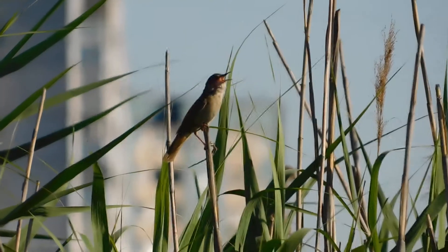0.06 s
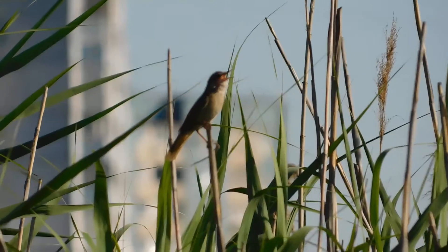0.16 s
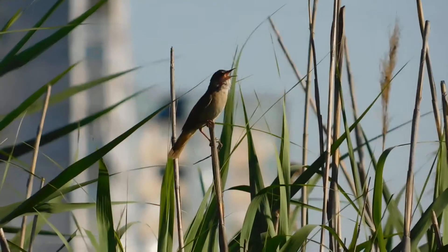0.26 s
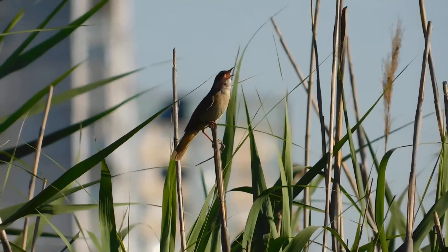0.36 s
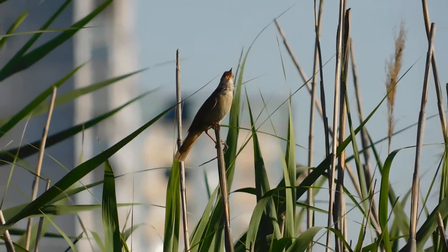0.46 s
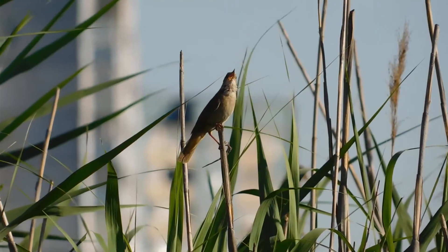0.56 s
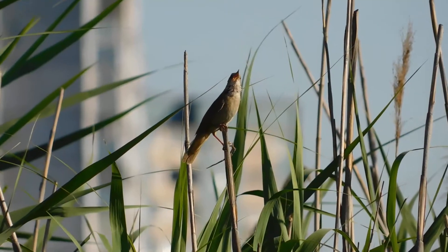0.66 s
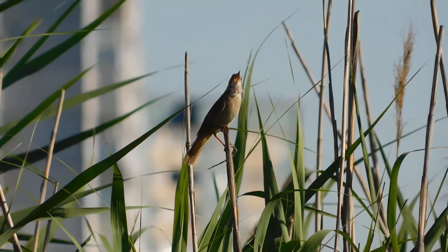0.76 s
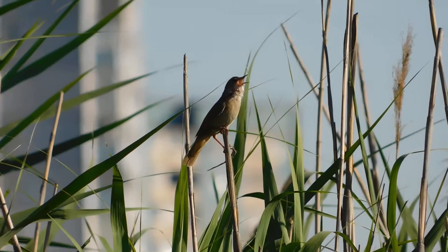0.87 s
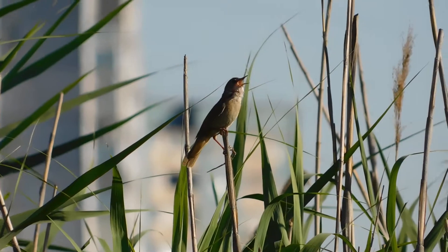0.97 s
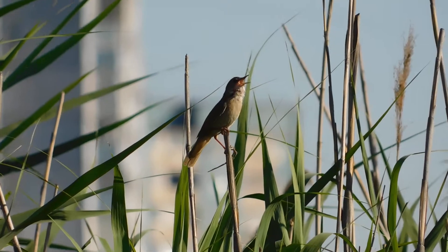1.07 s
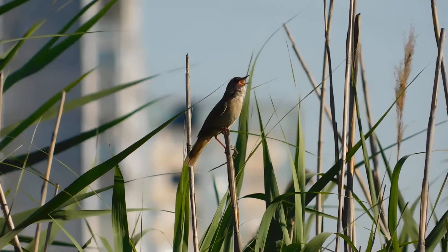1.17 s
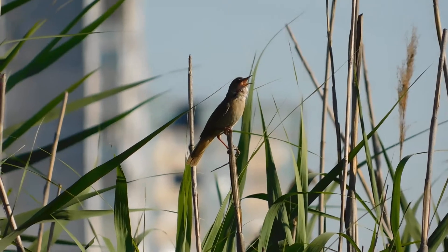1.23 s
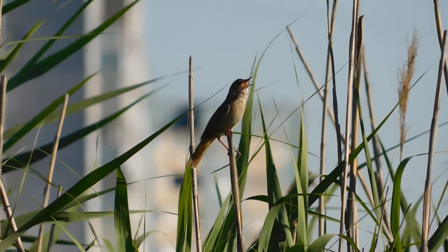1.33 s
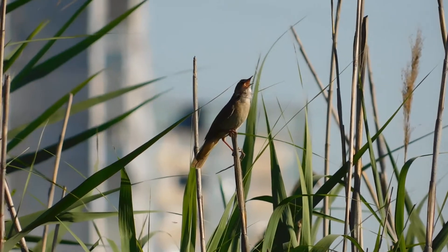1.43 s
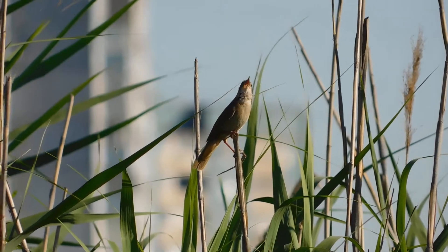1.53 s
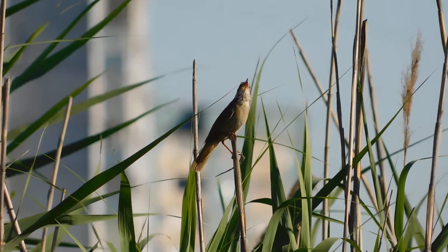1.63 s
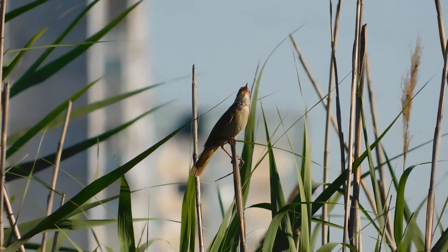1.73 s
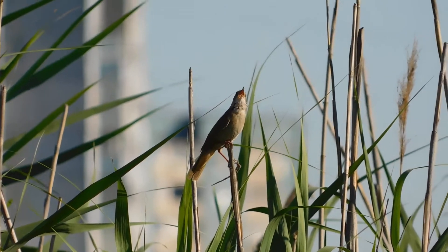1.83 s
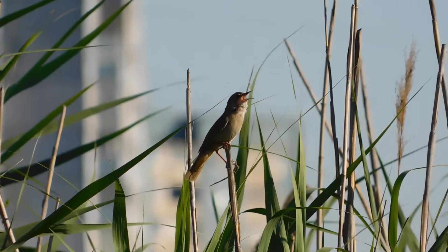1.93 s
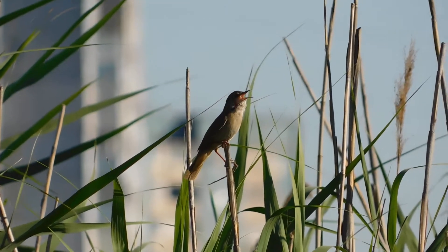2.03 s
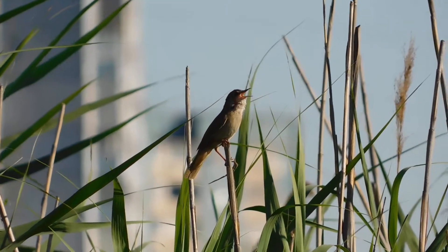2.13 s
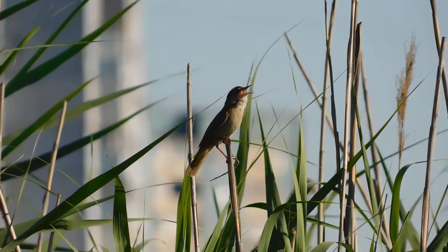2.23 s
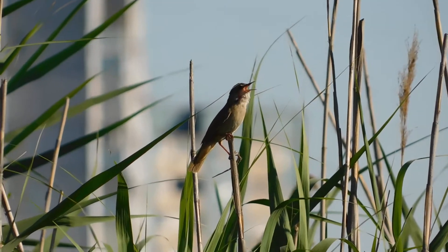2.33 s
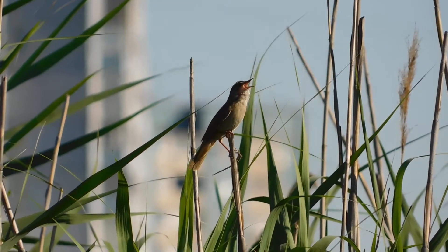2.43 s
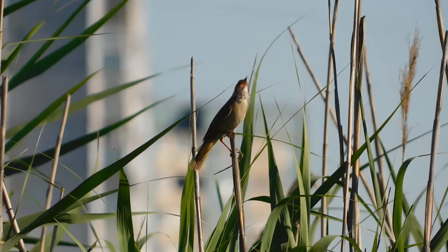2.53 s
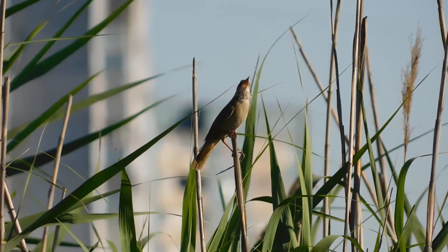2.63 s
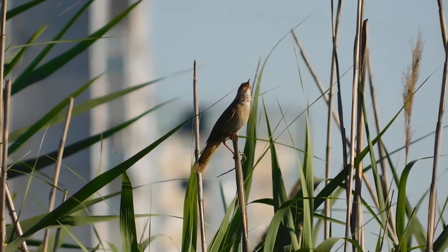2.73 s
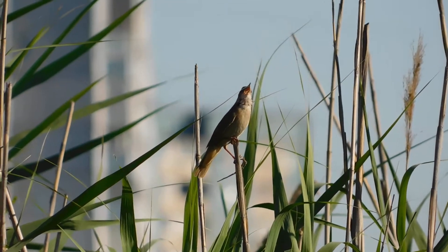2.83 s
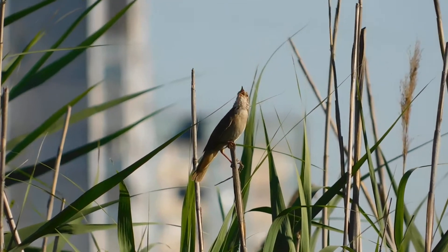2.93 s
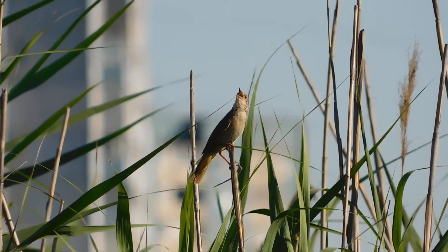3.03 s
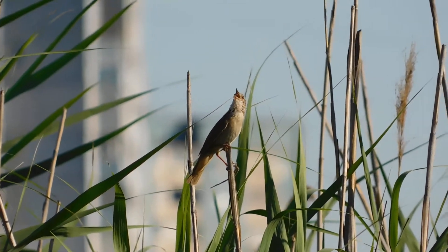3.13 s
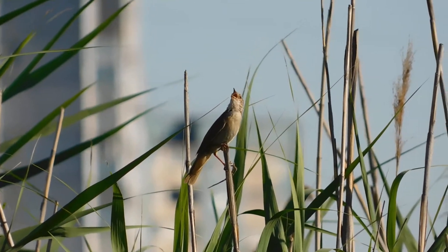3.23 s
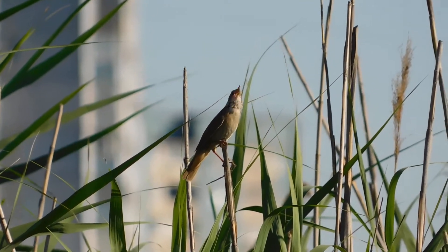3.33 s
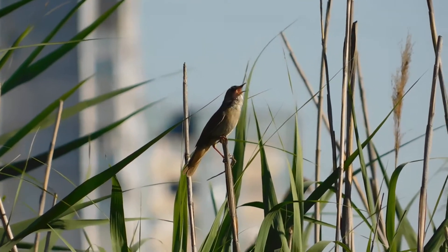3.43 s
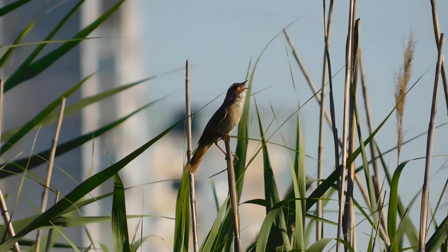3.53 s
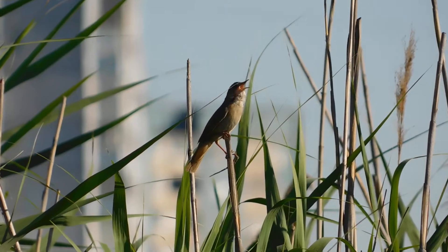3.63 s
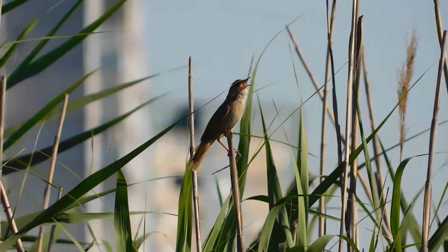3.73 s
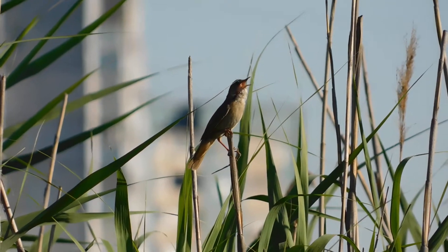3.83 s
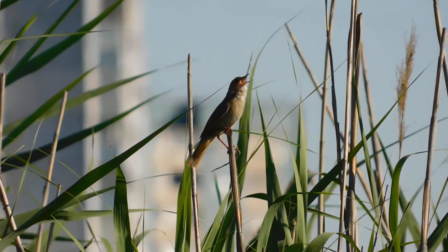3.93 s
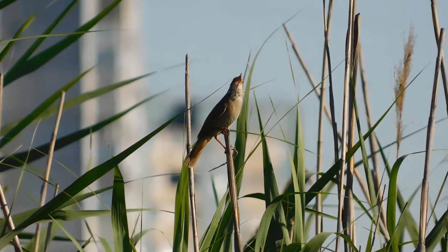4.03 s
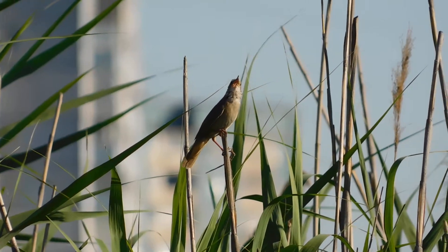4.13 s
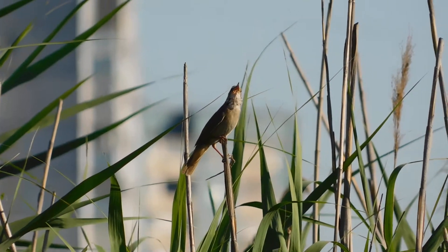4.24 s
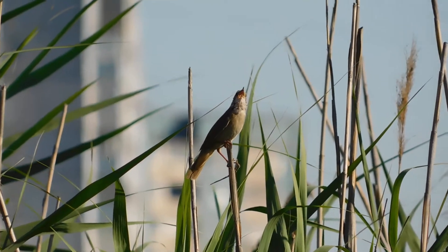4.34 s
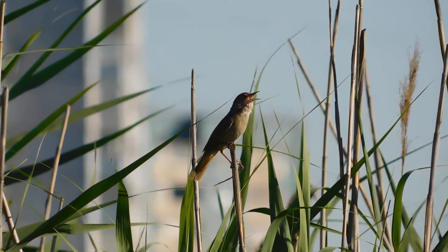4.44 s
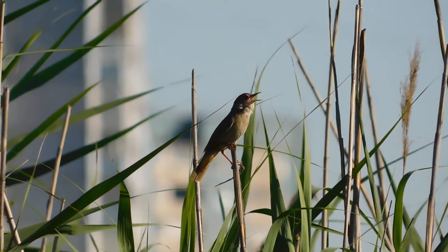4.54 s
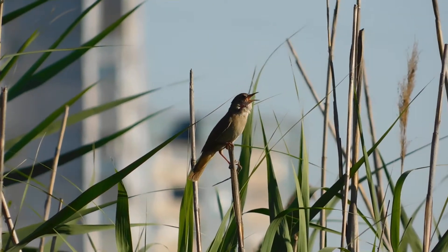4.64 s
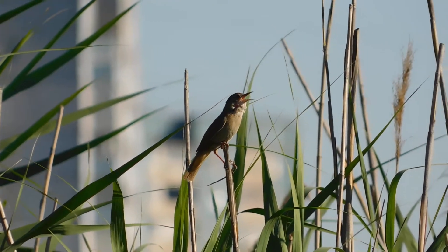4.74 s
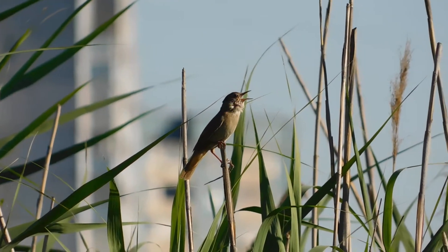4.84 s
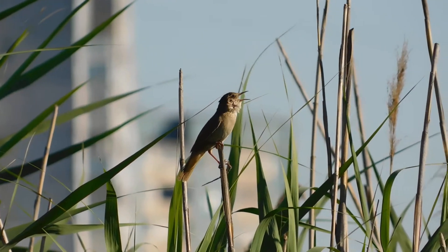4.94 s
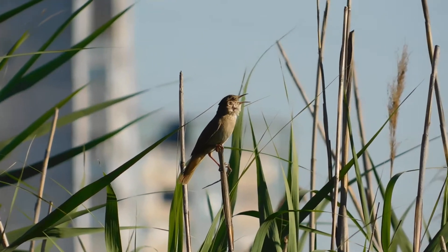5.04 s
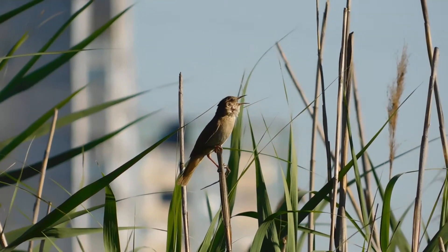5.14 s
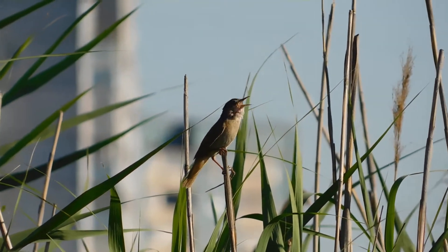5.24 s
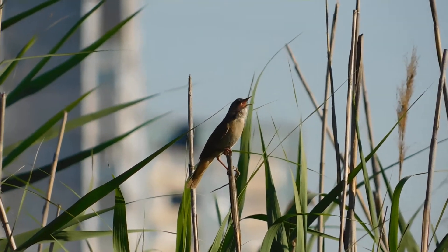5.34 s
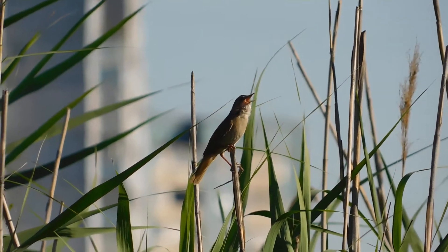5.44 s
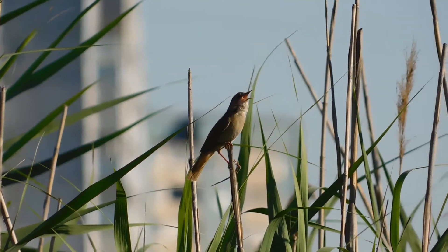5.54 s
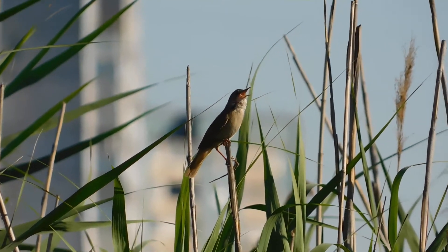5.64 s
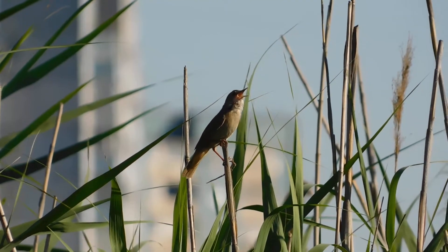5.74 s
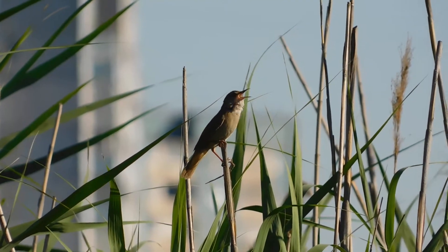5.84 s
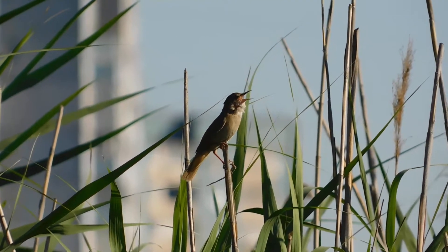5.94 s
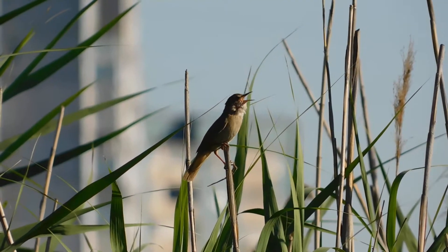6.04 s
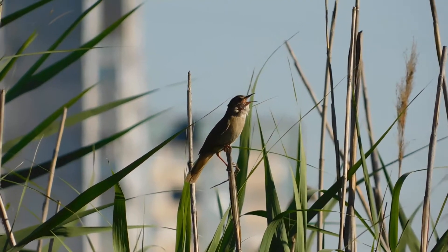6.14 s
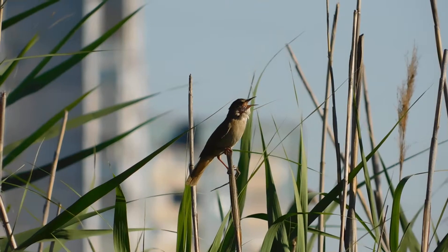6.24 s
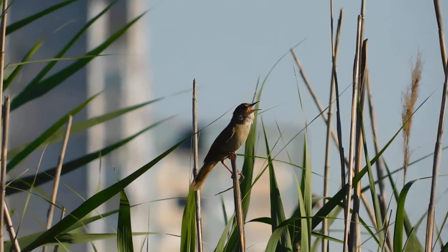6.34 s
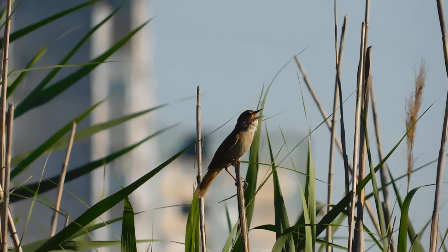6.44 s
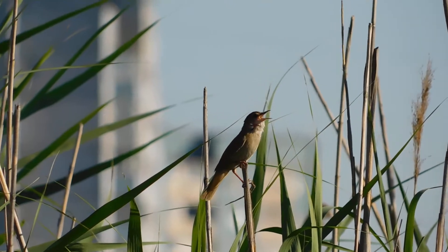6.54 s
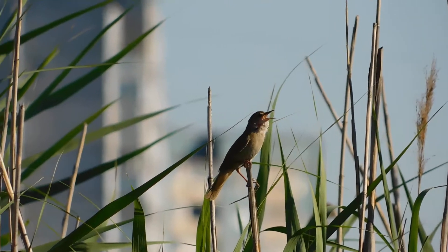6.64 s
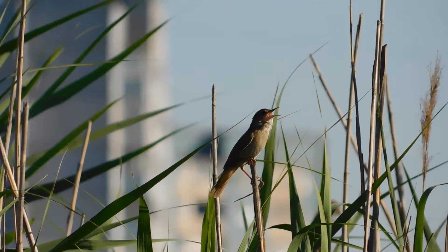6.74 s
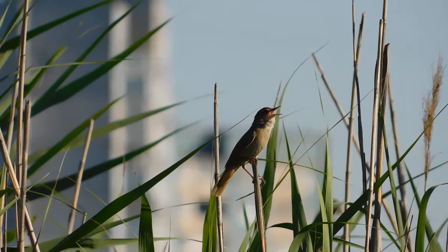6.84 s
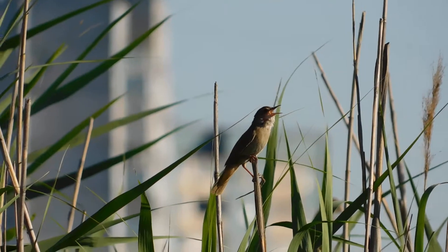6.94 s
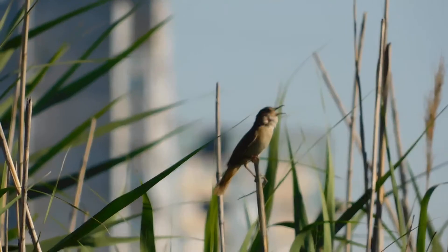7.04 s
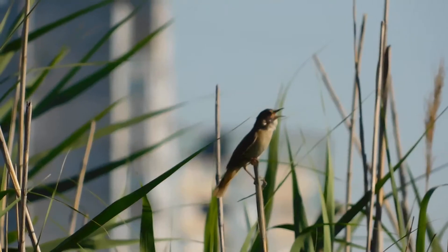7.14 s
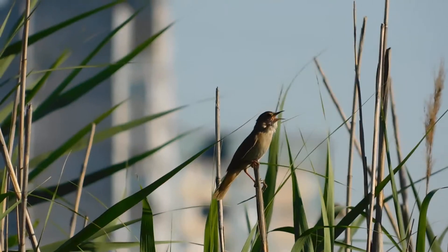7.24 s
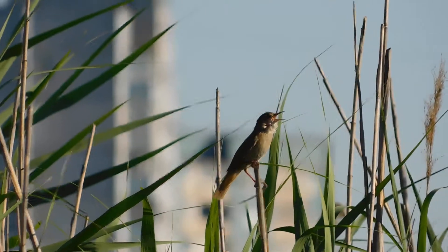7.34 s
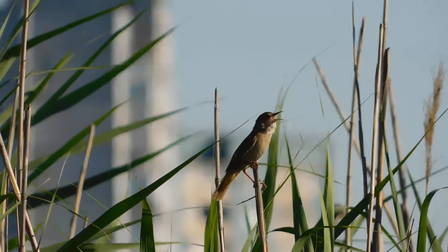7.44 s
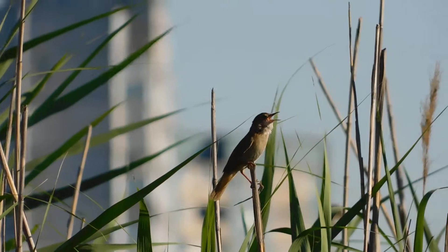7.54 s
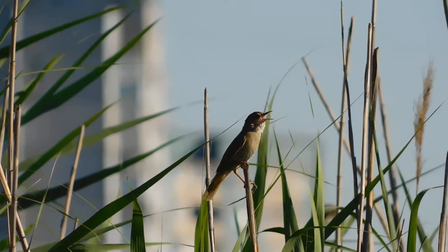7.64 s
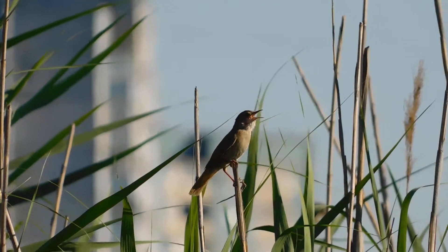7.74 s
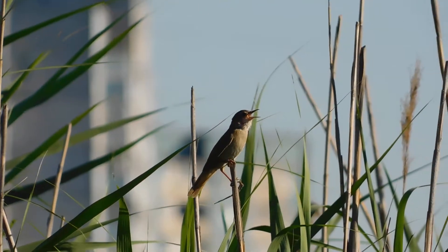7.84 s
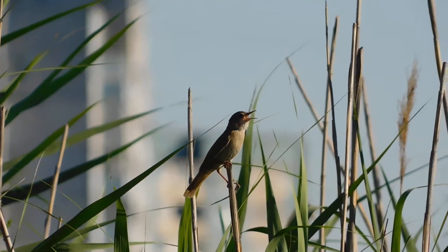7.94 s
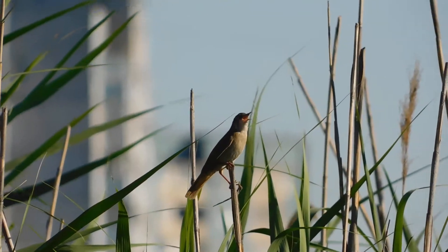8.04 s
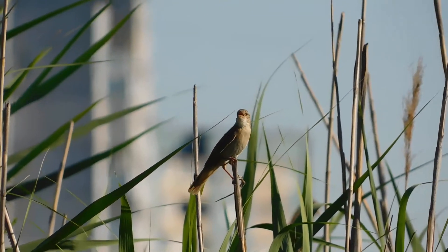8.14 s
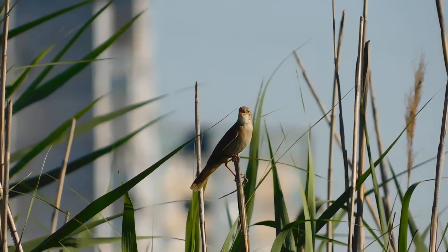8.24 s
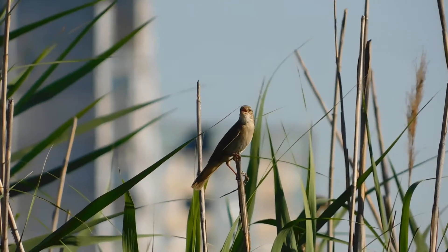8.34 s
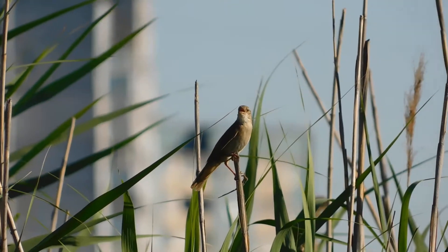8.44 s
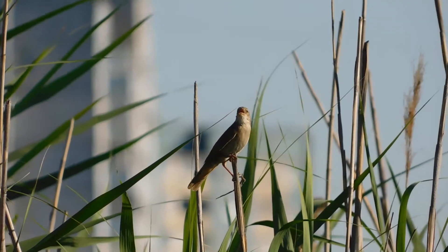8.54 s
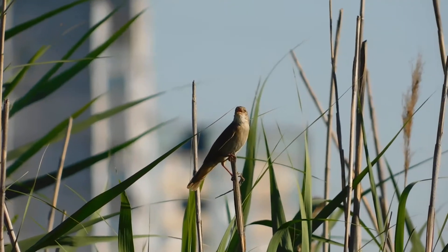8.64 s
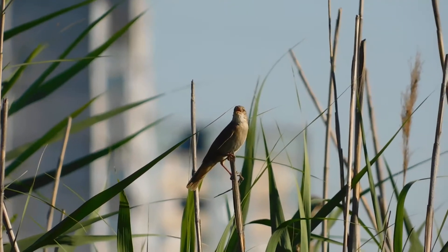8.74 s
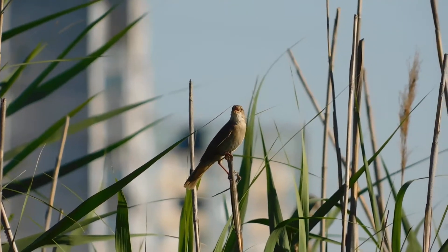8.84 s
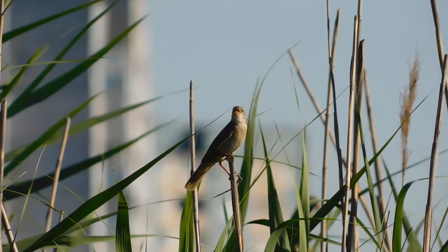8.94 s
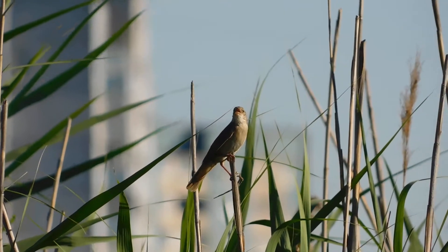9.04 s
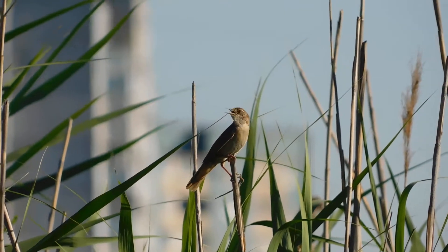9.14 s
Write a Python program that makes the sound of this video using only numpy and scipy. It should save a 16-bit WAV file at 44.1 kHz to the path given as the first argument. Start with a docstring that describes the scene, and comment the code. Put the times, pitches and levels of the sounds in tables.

```python
"""A warbler reels from a reed stem at the edge of a town: a tick, an upward flick and a level note, some 52 times a second.
The reel stumbles once, slows evenly, fades and stops; two sharp clicks and a faint one follow near the microphone.
Far off, other small birds chirp over a wash of traffic, a rumble, a faint hiss and an idling engine.
The birds and the engine are sine tones, the ticks and clicks ringing resonances, the wash, rumble and hiss shaped noise."""
import sys
import numpy as np
from scipy import signal
from scipy.fft import rfft, irfft
from scipy.io import wavfile

SR = 44100
rng = np.random.default_rng(int(sys.argv[2]) if len(sys.argv) > 2 else 0)


def file_out(sig):
    """Save sig as 16-bit WAV at sys.argv[1]."""
    # one column per channel
    cols = np.atleast_2d(sig).T
    # limit, then scale
    lim = np.clip(cols, -1, 1)
    pcm = np.round(lim * 32767).astype(np.int16)
    wavfile.write(sys.argv[1], SR, pcm)


N = 405279
TIME = np.arange(N) / SR

# Strength of the song through the scene. Each row: time in seconds, level in dB.
SONG_LEVEL = [(0.15, -48), (0.19, -48), (0.47, -48), (2.02, -49), (4.91, -47), (4.95, -49), (5.39, -47),
              (7.3, -48.5)]
# The two whistled notes of a syllable, traced point by point.
# Each row: time after the syllable's start in ms, pitch in Hz, relative level in dB.
FLICK = [(-.4, 3450, -16), (.15, 3520, -2), (.8, 3980, 4.5), (1.25, 4350, 2), (1.8, 4590, -2.5),
         (2.5, 4580, -6), (3.4, 4480, -6), (4.3, 4050, -6), (5.2, 4000, -7), (6.1, 4100, -10)]
NOTE = [(6.55, 3800, -20), (7.1, 3890, 0), (7.55, 3950, 4.3), (8.4, 3990, 3.8), (9.4, 4000, 3.4),
        (10.1, 4100, -3), (11.8, 4110, -16)]
# Resonances of the opening tick. Each row: frequency in Hz, width in Hz, relative level in dB.
TICK_RESONANCES = [(1860, 1000, -7.5), (2250, 230, -4), (2970, 610, 0.5), (5000, 680, -1), (6010, 1900, -1),
                   (6890, 680, 2)]
# The overtones and rasp weaken as the bird tires, and further as the song fades.
BRIGHT_DB, TIRING_DB_PER_S, DULLING_DB_PER_DB = 1.65, .35, 1.2


def reel(flick_db=7.0, note_db=6.5, tick_db=18.0, flicker_db=1.0):
    """Each syllable snaps open with a tick, flicks upward, then sounds its level note."""
    level_db = in_time(SONG_LEVEL) + fade()
    bright_db = BRIGHT_DB - TIRING_DB_PER_S * TIME + DULLING_DB_PER_DB * fade()
    bright_db = bright_db + flicker_db * rng.standard_normal(N)
    starts = syllable_starts()

    flick = from_db(flick_db) * notes(starts, FLICK, bright_db, scatter_hz=34.5, uneven_db=0.9,
                                      length_spread=0.033, rasp_db=-28.0)
    # the small throat passes little below the foot of the flick
    flick = signal.sosfilt(signal.butter(8, 3380, "high", fs=SR, output="sos"), flick)
    note = from_db(note_db) * notes(starts, NOTE, bright_db, scatter_hz=31.9, uneven_db=0.94,
                                    length_spread=0.02, rasp_db=-32.5)

    # the tick snaps just over half a millisecond before the syllable's start
    snaps = np.zeros(N)
    snaps[starts - SR // 1700] = from_db(tick_db + rng.normal(0, .8, len(starts)))
    # no two ticks are alike: each carries a fraction of a millisecond of grit
    grit_level = .08 * signal.lfilter([1], [1, -.94], snaps + 1e-18)
    snaps = snaps + grit_level * rng.standard_normal(N)
    tick = 0
    for k, (hz, width_hz, db) in enumerate(TICK_RESONANCES):
        tick = tick + (-1) ** k * from_db(db) * resonance(snaps, hz, width_hz)
    tick = signal.sosfilt(signal.butter(6, 7400, fs=SR, output="sos"), tick)

    syllables = panned(flick, left_db=-3.2) + panned(note, left_db=3.5) + panned(tick, left_db=-2.0)
    return from_db(level_db) * syllables


# Overtones of the notes. Each row: multiple of the pitch, relative level in dB.
OVERTONES = [(2, -35.5), (3, -36.5)]
# Breathy rasp that rides on the notes. Each row: frequency in Hz, relative density in dB per Hz.
RASP = [(4200, -23), (4900, 7), (5600, 7), (7000, 7.5), (8200, -0.5), (9000, 2.5), (10000, -40),
        (11000, -12), (12000, 6), (12800, -5), (13600, -5), (15500, -14)]


def notes(starts, contour, bright_db, scatter_hz, uneven_db, length_spread, rasp_db):
    """One short whistle per syllable, each with its own pitch, strength and length, and a rasp that follows it."""
    ms, hz, db = np.transpose(contour)
    offsets = np.arange(-SR // 1000, SR // 75)
    detune, strength, length, bend = rng.standard_normal((len(starts), 4)).T[:, :, None]
    age_ms = offsets * 1000 / SR * (1 + length_spread * length)

    along = (age_ms - ms.mean()) / np.ptp(ms)
    pitch = np.interp(age_ms, ms, hz) + scatter_hz * (detune + bend * along)
    phase = 2 * np.pi * (np.cumsum(pitch, axis=1) / SR + rng.random((len(starts), 1)))
    # silent outside the contour
    size_db = np.interp(age_ms, ms, db, left=-np.inf, right=-np.inf)
    size = from_db(size_db + uneven_db * strength)

    samples = starts[:, None] + offsets
    overtones = sum(from_db(level) * np.sin(k * phase) for k, level in OVERTONES)
    rasp = from_db(rasp_db) * diffuse(RASP)[0][samples]
    voice = np.sin(phase) + from_db(bright_db[starts, None]) * (overtones + rasp)
    out = np.zeros(N)
    np.add.at(out, samples, size * voice)
    return out


FIRST_START_S, LAST_START_S = .0036, 7.645
# syllables per second at the start, and how much of that is lost each second
PACE_PER_S, SLOWING_PER_S = 52.99, .122
# one syllable comes early: the moment, and the share of a syllable skipped
STUMBLE_S, STUMBLE_SHARE = .92, .32
SAG_PER_S_PER_DB = .33  # the pace sags with the fade


def syllable_starts():
    """Sample of every start: an evenly slowing pace with one stumble, a final sag and a slight tremor."""
    pace = PACE_PER_S - SLOWING_PER_S * TIME + SAG_PER_S_PER_DB * fade()
    turns = np.cumsum(pace) / SR
    turns = turns + STUMBLE_SHARE * (TIME > STUMBLE_S - FIRST_START_S)
    starts = np.interp(np.arange(int(turns[-1])), turns, TIME) + FIRST_START_S
    starts = starts[starts < LAST_START_S]
    tremor_s = rng.normal(0, .00013, len(starts))
    return ((starts + tremor_s) * SR).astype(int)


FADE_S, FADE_DB_PER_S = 7.42, 20


def fade():
    """Loss of strength as the song runs out, in dB."""
    return -FADE_DB_PER_S * np.maximum(TIME - FADE_S, 0)


# Narrow bands that a close reflection cancels. Each row: frequency in Hz, width in Hz, depth from 0 to 1.
HOLLOWS = [(3680, 150, .25), (4235, 120, .88), (4760, 130, .6)]


def hollowed(x):
    """A close reflection cancels narrow bands: part of each resonance is subtracted."""
    for hz, width_hz, depth in HOLLOWS:
        x = x - depth * resonance(x, hz, width_hz)
    return x


# The reed bed around the singer, in one row:
# tail level in dB, time for the tail to fall 60 dB in s, near scatter level in dB, its decay time in s.
SINGER_REEDS = (-9, .23, -11.5, .014)


def reed_bed(x, wet_db, t60, near_db, near_s):
    """Stems a metre or two away scatter the sound; the wider bed answers with a thin tail."""
    age = TIME[:SR // 2]
    early, late = rng.standard_normal((2, 2, len(age))) * (age > .005)
    early = early * np.exp(-age / near_s)
    late = late * from_db(-60 * age / t60)
    echoes = from_db(near_db) * rms_one(early) + from_db(wet_db) * rms_one(late)
    echoes = echoes / np.sqrt(len(age))
    return x + signal.fftconvolve(np.atleast_2d(x), echoes, axes=1)[:, :N]


# Contacts close to the microphone. Each row: start in seconds, level in dB, pitch factor,
# frequency in Hz above which it is dulled, left minus right in dB.
CLICKS = [(8.0197, -40, 1, 2500, -2), (8.0327, -28.5, 1.06, 11000, -8), (8.5256, -34, 0.805, 3040, -12.5),
          (8.5263, -39.5, 0.99, 9000, -12), (8.5276, -35, 0.65, 1300, -8), (8.538, -42.5, 0.33, 700, -3),
          (8.55, -45, 0.29, 600, -1), (8.903, -56, 1.7, 15000, 0)]
# What they ring with. Each row: frequency in Hz and relative level in dB, then the time in seconds
# to fall 60 dB; the pitch factor multiplies the frequency and divides the time.
CLICK_MODES = [(620, -17, 0.0066), (840, -14, 0.011), (1130, -6, 0.0094), (1505, -4, 0.014),
               (2280, -7, 0.0077), (2860, -9, 0.0081), (3650, -4, 0.015), (5960, -14, 0.0058),
               (8370, -19, 0.005), (10150, -22, 0.0044)]


def clicks(lag_s=.00014, rattle=0.49):
    """Short dry contacts ring a small hard body, each mode a decaying sine with a gritty noise band."""
    out, age = np.zeros((2, N)), TIME[:SR // 25]
    for s, db, factor, dull_hz, left_db in CLICKS:
        ring = 0
        for k, (hz, mode_db, t60) in enumerate(CLICK_MODES):
            pitch = hz * factor
            grit = rms_one(resonance(rng.standard_normal((2, len(age))), pitch, pitch / 2))
            decay = from_db(mode_db - 60 * age * factor / t60)
            ring = ring + (-1) ** k * decay * (np.sin(2 * np.pi * pitch * age) + rattle * grit)
        ring = signal.sosfilt(signal.butter(2, dull_hz, fs=SR, output="sos"), ring)
        start = int(s * SR)
        out[:, start:start + len(age)] += panned(from_db(db) * ring, left_db)
    # the right channel hears them slightly later
    return np.array([out[0], np.roll(out[1], int(lag_s * SR))])


# A far bird's short arched peeps. Each row: centre in seconds, length in seconds, top pitch in Hz, level in dB.
PEEPS = [(4.828, .016, 5700, -69), (4.862, .012, 4950, -59), (5.09, .046, 6720, -62),
         (5.565, .022, 5660, -64), (8.372, .024, 6250, -73), (8.49, .026, 6250, -75),
         (8.607, .03, 5750, -74), (8.857, .03, 5800, -75)]
# Its swoops, which dip and climb while a lower voice joins in.
# Each row: centre in seconds, lowest pitch in Hz, level in dB, pitch ratio of the lower voice.
SWOOPS = [(5.19, 5830, -62, .83), (5.285, 5800, -63, .83), (5.402, 5650, -68, .84), (8.722, 7100, -69, .5)]
# bends are the share of the pitch gained at both ends
PEEP_BEND, SWOOP_BEND, SWOOP_S = -0.044, 0.23, 0.052


def far_birds(lower_voice_db=5):
    """Arched peeps and two-voiced swoops, whistled as bending tones."""
    out = sum(from_db(db) * whistle(s, length, hz, PEEP_BEND) for s, length, hz, db in PEEPS)
    for s, hz, db, ratio in SWOOPS:
        upper = whistle(s, SWOOP_S, hz, SWOOP_BEND, skew=.9)
        lower = whistle(s, SWOOP_S, hz * ratio, SWOOP_BEND / 2, skew=3.0)
        # the deeper the lower voice, the weaker
        out = out + from_db(db) * (upper + from_db(lower_voice_db) * ratio ** 2 * lower)
    return out


def whistle(s, length, hz, bend, skew=0, waver_share=0.0124):
    """A thin wavering tone centred on s; its pitch bends toward both ends, and skew moves its weight to the end."""
    along = np.linspace(-1, 1, int(length * SR))
    waver = np.interp(along, np.linspace(-1, 1, num=12), rng.standard_normal(12))
    pitch = hz * (1 + bend * along ** 2 + waver_share * waver)
    shape = np.cos(np.pi * along / 2) * np.exp(skew * along)
    out, start = np.zeros(N), int((s - length / 2) * SR)
    out[start:start + len(along)] = shape / shape.max() * np.sin(2 * np.pi * np.cumsum(pitch) / SR)
    return out


# Spectra of the distant rumble, the traffic wash and a faint high hiss, perhaps air in the reeds.
# Each row: frequency in Hz, relative density in dB per Hz.
RUMBLE = [(15, -21), (28, 0.5), (36, 2.5), (45, 1.5), (59, 5.5), (72, -3.5), (102, -4), (120, -11),
          (180, -33.5)]
TRAFFIC = [(60, 3.5), (170, -4), (280, 0), (420, -1), (650, 1.5), (820, -2), (1000, 0), (1200, -4.5),
           (1500, -5.5), (2000, -10.5), (2500, -11.5), (3100, -15.5), (4300, -28), (5500, -30), (7000, -50)]
HISS = [(2000, -10), (4500, -1), (7000, -1), (9500, -1.5), (12000, -3.5), (15000, -6), (17000, -13)]
# Swell of the traffic. Each row: time in seconds, level in dB before traffic_db is added.
TRAFFIC_SWELL = [(0.0, -57.5), (1.2, -57.5), (1.84, -56.5), (2.28, -58), (9.19, -58)]
# Ringing bands in the town noise. Each row: frequency in Hz, width in Hz,
# level in dB of the white noise that drives the band.
TOWN_BANDS = [(1763, 46, -45.5), (2190, 47, -45), (2890, 97, -51)]
# Swells of the hiss. Each row: centre in seconds, half width in seconds, rise in dB.
HISS_SWELLS = [(.66, .3, 7.8), (1.5, .3, 3), (3.2, 0.88, 4.5), (3.8, 0.14, 3), (5.7, 0.25, 6.5),
               (8.87, .42, 6)]


def town(rumble_db=-62.5, traffic_db=2.5, hiss_db=-78.5):
    """Engines drone far away under a slowly swelling wash of tyres and a faint hiss."""
    rumble = from_db(rumble_db) * diffuse(RUMBLE) + engine()
    traffic = from_db(in_time(TRAFFIC_SWELL) + traffic_db) * diffuse(TRAFFIC)
    bands = 0
    for hz, width_hz, db in TOWN_BANDS:
        bands = bands + from_db(db) * resonance(rng.standard_normal((2, N)), hz, width_hz)
    rise_db = sum(db * np.exp(-((TIME - s) / width) ** 2) for s, width, db in HISS_SWELLS)
    hiss = from_db(hiss_db + rise_db) * diffuse(HISS)
    return panned(rumble + traffic + bands + hiss, left_db=-0.6)


# Orders of the far idling engine. Each row: multiple of the turning rate, level in dB.
ENGINE_ORDERS = [(3, -66.5), (4, -66.5), (5, -71.5)]


def engine(turning_hz=20, waver_hz=.12, wavers_per_s=1.506):
    """A low drone on a few orders of one slightly unsteady turning rate."""
    waver = np.interp(TIME * wavers_per_s, np.arange(40), rng.standard_normal(40))
    phase = 2 * np.pi * np.cumsum(turning_hz + waver_hz * waver) / SR
    drone = 0
    for k, db in ENGINE_ORDERS:
        # the root of two makes the level an RMS level
        drone = drone + np.sqrt(2) * from_db(db) * np.sin(k * phase + rng.uniform(0, 2 * np.pi))
    return drone


# How alike left and right are in noise from all around. Each row: frequency in Hz, likeness from 0 to 1.
LIKENESS = [(50, 1), (130, 0.95), (350, 0.89), (700, 0.78), (1400, 0.41), (3000, 0.058), (8000, 0.041),
            (14000, 0.027)]


def diffuse(spectrum):
    """Stereo noise of unit power from all around: alike in the bass, unrelated in the treble."""
    hz = np.arange(N // 2 + 1) * SR / N
    alike = np.clip(at_hz(LIKENESS, hz), 0, 1)
    mid, side = rfft(rng.standard_normal((2, N))) * from_db(at_hz(spectrum, hz))
    both = np.sqrt(1 + alike) * mid + np.sqrt(1 - alike) * side * [[1], [-1]]
    return rms_one(irfft(both, N))


def resonance(x, hz, width_hz):
    """Two-pole resonance with gain 1 on top."""
    r = np.exp(-np.pi * width_hz / SR)
    zeros = np.array([1, 0, -1]) * (1 - r * r) / 2
    poles = [1, -2 * r * np.cos(2 * np.pi * hz / SR), r * r]
    return signal.lfilter(zeros, poles, x + 1e-18)


def panned(x, left_db):
    """Share a sound between the channels; left_db is left minus right."""
    return x * from_db(np.array([[left_db], [-left_db]]) / 2)


def from_db(db):
    """Decibels to gain."""
    return 10 ** (np.asarray(db) / 20)


def rms_one(x):
    """Scale to unit power."""
    return x / np.sqrt(np.mean(x ** 2) + 1e-20)


def in_time(rows):
    """A curve of (seconds, value) at every sample."""
    s, values = np.transpose(rows)
    return np.interp(TIME, s, values)


def at_hz(points, hz):
    """Read a spectrum on a log-frequency axis."""
    known, values = np.transpose(points)
    return np.interp(np.log(hz + 1), np.log(known), values)


def scene():
    """The singer in its reeds, far birds in theirs, dry clicks close by and the town behind."""
    song = reed_bed(hollowed(reel()), *SINGER_REEDS)
    others = reed_bed(far_birds(), wet_db=-7, t60=.3, near_db=-7, near_s=.01)
    return song + others + clicks() + town()


def record(dry):
    """The top is cut steeply above 15.7 kHz."""
    return signal.sosfilt(signal.ellip(10, .1, 70, 15700, fs=SR, output="sos"), dry)


dry = scene()
out = record(dry)
file_out(out)
```